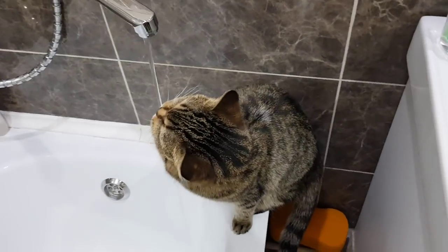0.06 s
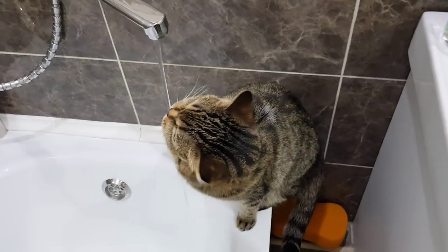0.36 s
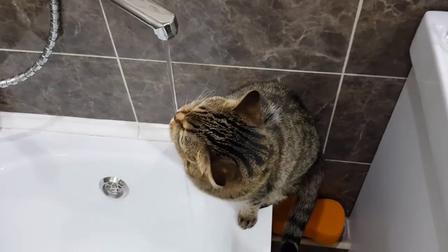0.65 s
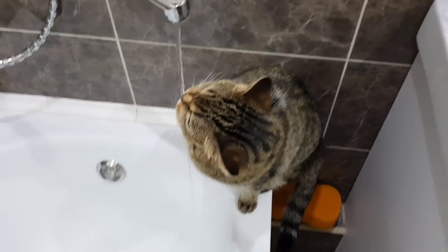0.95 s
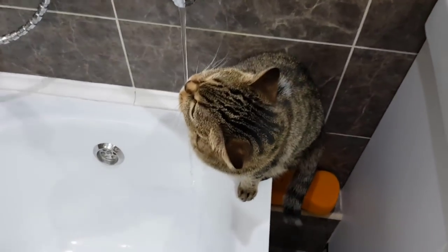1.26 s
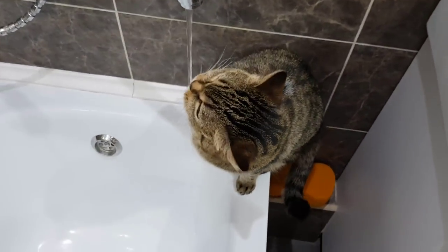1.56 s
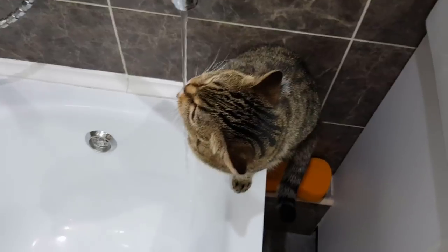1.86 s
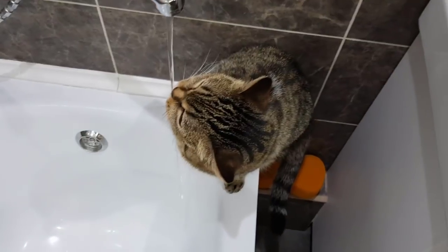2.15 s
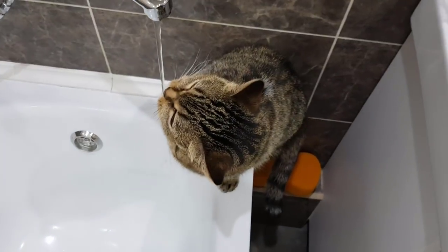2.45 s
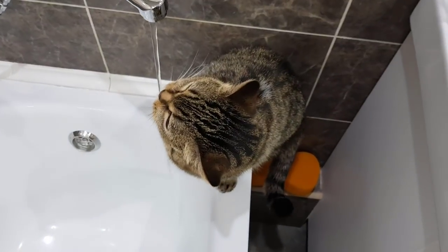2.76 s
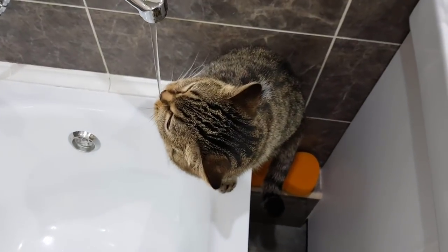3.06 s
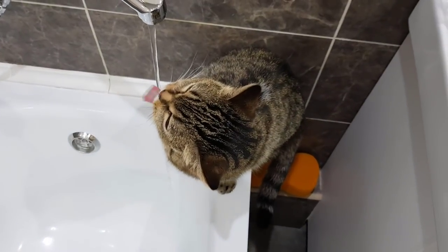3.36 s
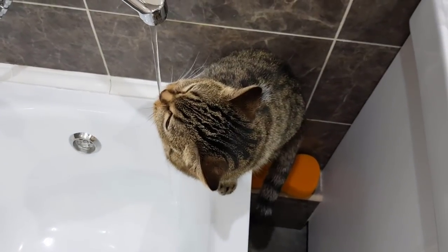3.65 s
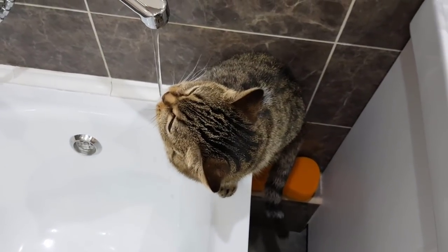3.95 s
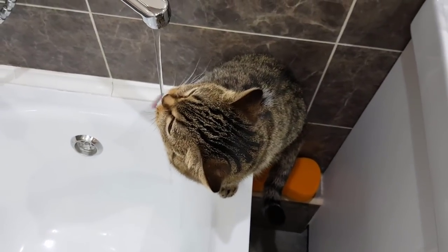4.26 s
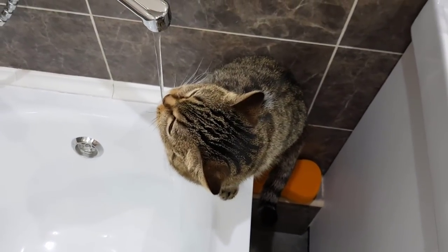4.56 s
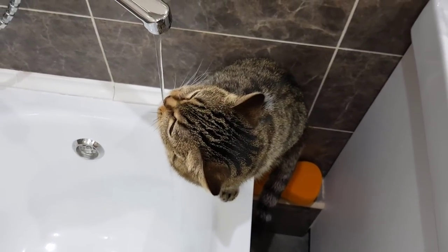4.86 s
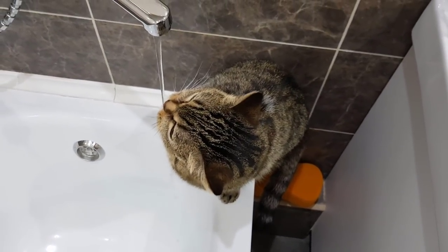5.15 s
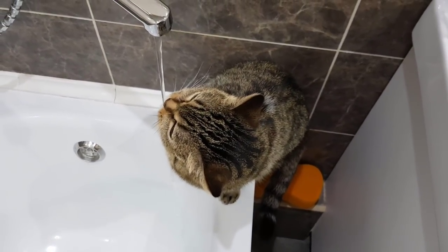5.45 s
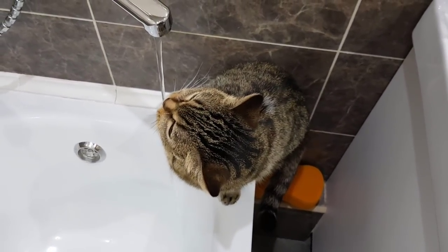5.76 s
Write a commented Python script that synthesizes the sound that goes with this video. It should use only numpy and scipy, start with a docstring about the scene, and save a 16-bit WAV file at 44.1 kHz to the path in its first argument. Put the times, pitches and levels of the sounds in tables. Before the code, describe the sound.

A thin stream of tap water runs into a bathtub for the whole six seconds, quiet and steady, a little to the right. It hisses, fizzes and gurgles, with tiny ringing bubbles and faint, thin whistling tones. The tub drums dully beneath it, with an occasional soft thud, over a low hum that swells slightly between 3 and 5 seconds.

A cat laps at the stream from about 0.5 seconds to the end, making faint, wet tongue ticks roughly twice a second. At about 1.3 seconds its lips part with one short, high squeak. Soft gulps come now and then, clearest at about 0.6 and 5.6 seconds. Small flung drops plink here and there, more often after 2.4 seconds. The small tiled bathroom gives everything a short, bright echo.

```python
"""A thin stream of tap water hisses and gurgles into a bathtub in a small tiled bathroom.
Droplets and tiny bubbles ring, thin tones whistle and the tub drums under the stream, over a low hum.
A cat drinks from it: soft gulps puff through its throat, its tongue flings drops and ticks in the water,
and its wet lips squeak once as they part."""
import sys
import numpy as np
from scipy import signal
from scipy.fft import rfft, irfft, next_fast_len
from scipy.io import wavfile
from scipy.ndimage import map_coordinates

SR = 44100
rng = np.random.default_rng(int(sys.argv[2]) if len(sys.argv) > 2 else 0)


def generate_wav(sig):
    """Save sig (samples, or channels by samples) to the path in sys.argv[1] as 16-bit PCM at SR."""
    pcm = np.round(np.clip(np.atleast_2d(sig).T, -1, 1) * 32767).astype(np.int16)
    wavfile.write(sys.argv[1], SR, pcm)


N = 264600


def amp(db):
    """Decibels to gain."""
    return 10 ** (np.asarray(db) / 20)


def unit(x):
    """x scaled to rms 1."""
    return x / np.sqrt(np.mean(x ** 2) + 1e-20)


def along(points, hz):
    """Reads a curve of (Hz, value) points on a log frequency axis."""
    freqs, values = np.transpose(points)
    return np.interp(np.log(hz + 1), np.log(freqs + 1), values)


def wobble(rate):
    """A smooth random curve, rate knots a second."""
    knots = rng.standard_normal(int(N * rate / SR) + 4)
    return map_coordinates(knots, [np.arange(N) * rate / SR])


def filtered(x, response):
    """x through a filter given as complex gain against frequency."""
    size = next_fast_len(x.shape[-1] + SR // 2)
    return irfft(rfft(x, size) * response(np.fft.rfftfreq(size, 1 / SR)), size)[..., :x.shape[-1]]


def coloured(x, spectrum):
    """x through an EQ curve of (Hz, dB) points, at rms 1."""
    return unit(filtered(x, lambda hz: amp(along(spectrum, hz))))


def resonances(modes, f):
    """Response of a bank of (Hz, width in Hz, dB) resonators in alternating polarity."""
    return sum((-1) ** k * amp(db) * 1j * f * width / (hz * hz - f * f + 1j * f * width)
               for k, (hz, width, db) in enumerate(modes))


def swelling(t, peak_s):
    """A soft rise to 1 at peak_s and a slower fall; silent before t = 0."""
    u = np.maximum(t, 0) / peak_s
    return u ** 2 * np.exp(2 - 2 * u)


def burst(noise, envelope):
    """Noise under an envelope, at rms 1 where the envelope is 1."""
    return unit(noise * envelope) * np.sqrt(np.mean(envelope ** 2))


def add(track, start, sound):
    """Lays a sound into the track at start seconds."""
    part = track[..., max(0, round(start * SR)):][..., :sound.shape[-1]]
    part += sound[..., :part.shape[-1]]


# The reverb of the tiled room. Each row: frequency in Hz, seconds to fall 60 dB.
TILE_DECAY = [(100, .4), (1000, .33), (4400, .38), (6000, .25), (15000, .18)]

def bathroom(x, wet_db):
    """Direct sound plus the ring of the tiles, different at each ear; keeps the energy."""
    hz, t, noise = signal.stft(rng.standard_normal((2, SR // 2)), SR, nperseg=256)
    t60 = along(TILE_DECAY, hz)[:, None]
    tail = signal.istft(noise * amp(-60 * t / t60), SR, nperseg=256)[1]
    impulse = amp(wet_db) * tail / np.linalg.norm(tail[0])
    impulse[:, 0] += 1  # the direct sound
    return signal.fftconvolve(x[None], impulse / np.linalg.norm(impulse[0]), axes=1)[:, :N]


def standing_waves(x, depth_db, spacing_hz, drift_per_s):
    """Echoes between the tiles ripple the spectrum; the pattern drifts as the listener moves."""
    hz, t, spectrum = signal.stft(x, SR, nperseg=2048)
    grid = np.meshgrid(hz / spacing_hz, t * drift_per_s, indexing="ij")
    ripple = np.array([map_coordinates(rng.standard_normal((1024, 16)), grid, mode="wrap") for ear in x])
    return unit(signal.istft(spectrum * amp(depth_db * ripple), SR, nperseg=2048)[1][:, :N])


def patter(rate, spread_db):
    """Random droplet impacts, rate a second, with a few large among many small."""
    hit = rng.random(N) < rate / SR
    size = amp(spread_db * np.clip(rng.standard_normal(N), -2, 2))
    return unit(hit * size * np.sign(rng.standard_normal(N)))


def spray(rate, wash_db):
    """Stereo droplet impacts: their direct sound over the smooth wash of their countless echoes."""
    direct_db, left_late_s = -5.5, .00008
    near = np.array([patter(rate, spread_db=4), patter(rate, spread_db=1.0)])
    echoes = unit(near + amp(wash_db) * rng.standard_normal((2, N)))
    impacts = unit(patter(rate, spread_db=1.0) + rng.standard_normal(N))
    direct = filtered(impacts, lambda f: np.exp(-2j * np.pi * np.outer([left_late_s, 0], f)))
    return standing_waves(echoes + amp(direct_db) * direct, depth_db=3.3, spacing_hz=55, drift_per_s=.6)


# The tone of the water's three registers. Each row: frequency in Hz, gain in dB.
GURGLE_EQ = [(820, -29), (1400, -33.5), (1810, -18), (1960, 1.5), (2080, -1), (2220, -0.5), (2320, -8.5),
             (2380, -1), (2510, 4), (2900, -3), (3040, -46), (3300, -45), (4290, -49), (7260, -120)]
SPOUT_EQ = [(1760, -23), (3000, -9.5), (3150, -11.5), (3450, -5.5), (4160, -2), (4330, -1), (4600, 4),
            (5640, -1.5), (6240, -3), (7430, -17), (7800, -27), (10100, -52), (17200, -120)]
FIZZ_EQ = [(5000, -40.5), (7400, -24), (8300, -12.5), (10000, -8.5), (10800, -6), (11700, -7), (13000, -4),
           (13750, -4.5), (14200, 3), (14650, 0), (15100, -2), (15700, -2.5)]
# The gurgle's fader ride. Each row: time in seconds, gain in dB.
GURGLE_RIDE = [(0, 1.5), (.5, 1.5), (.8, -1.8), (1.6, -0.8), (3, 0), (6, -0.5)]

def stream():
    """Droplets and tiny bubbles ring in three registers: gurgle, spout hiss and fine fizz."""
    gurgle_db, spout_db, fizz_db = -58, -53.5, -43.8
    t = np.arange(N) / SR
    ride_db = np.interp(t, *np.transpose(GURGLE_RIDE))
    opening_db = np.interp(t, [0, 0.62], [-0.8, 0])  # the hiss starts a little weak
    bubbles = bathroom(patter(rate=700, spread_db=6.0), wet_db=6.5) + 0.45 * spray(rate=340, wash_db=1.5)
    gurgle = amp(gurgle_db + ride_db) * coloured(bubbles, GURGLE_EQ)
    spout = amp(spout_db + opening_db) * coloured(spray(rate=1800, wash_db=-2.5), SPOUT_EQ)
    fizz = amp(fizz_db + opening_db) * coloured(spray(rate=1500, wash_db=5.5), FIZZ_EQ)
    # the thin stream wavers, its larger bubbles most
    return gurgle * amp(1.45 * wobble(20)) + spout * amp(.8 * wobble(18)) + fizz * amp(.8 * wobble(22))


def bubble(hz, t60, rise):
    """A trapped bubble whose pitch climbs as it dies."""
    t = np.arange(SR // 20) / SR
    envelope = amp(-60 * t / t60) * (1 - np.exp(-t / 0.00077))
    return envelope * np.sin(2 * np.pi * hz * t * (1 + rise * t))


# Two sizes of bubble. Each row: pops per second, pitch in Hz, pitch scatter as a share, level in dB.
BUBBLE_SIZES = [(45, 2510, 0.025, -64), (50, 4680, 0.05, -64)]

def bubble_pops(t60, spread_db):
    """Single bubbles pop out of the running water at random."""
    out, slots = np.zeros((2, N)), N // 100
    slot_s = N / SR / slots
    for rate, hz, scatter, db in BUBBLE_SIZES:
        pops = np.zeros(N)
        popping = rng.random(slots) < rate * slot_s
        detune, strength = np.clip(rng.standard_normal((slots, 2)), -1.8, 1.8).T
        for k in np.flatnonzero(popping):
            pop = bubble(hz * np.exp(scatter * detune[k]), t60, rise=1)
            add(pops, k * slot_s, amp(spread_db * strength[k]) * pop)
        out += amp(db) * unit(bathroom(pops, wet_db=7))
    return out


# Thin tones of the running water. Each row: start and end in seconds, pitch and width in Hz, level in dB.
WATER_TONES = [(0, 6, 2452, 40, -63), (0, 6, 3588, 16, -73), (0, 0.78, 4773, 12, -59.5),
               (0.85, 6, 4771, 16, -67), (1.3, 6, 4470, 70, -65), (0.7, 1.8, 5320, 130, -62),
               (0.2, 2.1, 6358, 40, -68), (0.9, 6, 10830, 110, -67), (0.55, 6, 14190, 110, -57.5),
               (2.3, 6, 14400, 30, -62)]

def water_tones(fade_s):
    """A steady ring near 2450 Hz and faint higher whistles, all thin, jittery lines."""
    out, t = np.zeros((2, N)), np.arange(N) / SR
    for start, end, hz, width, db in WATER_TONES:
        gate = np.clip(np.minimum(t - start, end - t) / fade_s + 1, 0, 1)
        phase = 2 * np.pi * np.cumsum(hz + width / 2 * wobble(4 * width)) / SR
        for ear in out:  # each ear catches its own mix of reflections
            ear += gate * amp(db + 3.6 * wobble(width)) * np.sin(phase + .5 * wobble(width))
    return out


# The boom of the tub's shell. Each row: pitch in Hz, width in Hz, gain in dB.
SHELL_MODES = [(83.2, 6.1, 0), (106, 11.3, -5.5), (117.3, 14.5, -4.5), (134, 10.5, -3), (174.6, 4.1, -3.5)]
# Dull thuds in the tub as the cat drinks. Each row: start in seconds, level in dB.
TUB_THUDS = [(0.04, -57), (0.52, -61), (0.79, -66), (1.3, -56), (1.86, -54), (2.579, -57.5), (2.73, -59),
             (3.2, -55.5), (3.46, -55.5), (4.165, -53), (4.93, -60.5), (5.26, -56.5), (5.63, -54),
             (5.87, -63)]

def tub(drum_db, wander_db, thud_swell_s):
    """The stream drums on the shell, with a thud now and then; the low modes reach both ears alike."""
    t = np.arange(N) / SR
    shell = lambda f: resonances(SHELL_MODES, f) * f ** 4 / (f ** 4 + 65 ** 4)  # low cut at 65 Hz
    blows = patter(rate=900, spread_db=3.0) + amp(-15) * rng.standard_normal((2, N))
    drumming = unit(filtered(blows, shell))
    rumble = filtered(rng.standard_normal(N), shell)
    thuds = sum(amp(db) * burst(rumble, swelling(t - start, thud_swell_s)) for start, db in TUB_THUDS)
    return amp(drum_db + wander_db * wobble(9)) * drumming + thuds


# The colour of the room tone. Each row: frequency in Hz, gain in dB.
ROOM_EQ = [(12, -31), (20, -23), (48, -12.5), (75, -0.5), (160, -21), (224, -20), (285, -18.5),
           (568, -30.5), (871, -29), (1440, -39.5), (1700, -36), (2210, -80), (3740, -120)]

def room_tone(level_db):
    """A bed of dull, steady noise, partly shared by both ears."""
    return amp(level_db) * coloured(rng.standard_normal((2, N)) + 0.61 * rng.standard_normal(N), ROOM_EQ)


# Swells in the low hum. Each row: start in seconds, level in dB.
HUM_SURGES = [(3.31, -54.5), (4.02, -56), (4.89, -60.5)]

def hum(pitch_hz, steady_db, swell_s, waver_hz, waver_db):
    """A low, wavering hum that swells now and then, with a faint tone an octave below."""
    t = np.arange(N) / SR
    phase = 2 * np.pi * np.cumsum(pitch_hz + waver_hz * wobble(18)) / SR
    swell_power = sum((amp(db) * swelling(t - start, swell_s)) ** 2 for start, db in HUM_SURGES)
    level = np.sqrt(amp(steady_db) ** 2 + swell_power) * amp(waver_db * wobble(8.3))
    sub_octave = amp(-73.5 + 1.7 * wobble(2.6)) * np.sin(phase / 2)
    return level * np.sin(phase) + sub_octave


# Soft gulps. Each row: start in seconds, level in dB, swell in seconds, centre in Hz.
GULP_CUES = [(0.074, -61, 0.028, 1410), (0.552, -51, 0.03, 1170), (1.85, -68.5, 0.035, 1610),
             (2.70, -59.5, 0.043, 2300), (3.21, -64.5, 0.043, 406), (4.189, -68.5, 0.061, 230),
             (4.922, -58.5, 0.043, 2000), (5.642, -49, 0.031, 1470)]
# The formants of the throat. Each row: frequency in Hz, width in Hz, gain in dB.
THROAT_MODES = [(247, 63, 0), (430, 39, 2.5), (515, 103, -4.5), (753, 290, -9), (965, 73, -1.5),
                (1180, 175, -3.5), (1370, 200, -4.5), (1516, 78, -2.5), (1710, 72, 0), (1945, 260, 0),
                (2970, 560, 6.5)]
# Short hollow rings around the deep gulps, and one higher plink of a drop.
# Each row: start in seconds, level in dB, pitch in Hz.
SHORT_RINGS = [(0.581, -54, 957), (0.64, -57, 2700), (5.652, -54, 1920), (0.566, -65.5, 580),
               (5.66, -64, 520)]

def gulps(grain, focus, ring_q, ring_swell_s):
    """Soft, wet puffs through the throat; hollow rings surround the deep ones, and one drop plinks."""
    out, t = np.zeros((2, N)), np.arange(SR // 3) / SR
    for start, db, swell_s, centre_hz in GULP_CUES:
        wet_noise = rng.standard_normal(len(t)) * np.exp(grain * rng.standard_normal(len(t)))
        band = lambda f: 1 / np.sqrt(1 + (focus * np.log2((f + 1) / centre_hz)) ** 2)
        mouth = lambda f: band(f) / (1 + (f / 2600) ** 6)  # high cut at 2600 Hz
        puff = filtered(wet_noise, lambda f: resonances(THROAT_MODES, f) * mouth(f))
        add(out, start, bathroom(amp(db) * burst(puff, swelling(t, swell_s)), wet_db=4.0))
    for start, db, hz in SHORT_RINGS:
        ring = filtered(rng.standard_normal(len(t)), lambda f: resonances([(hz, hz / ring_q, 0)], f) ** 2)
        add(out, start, bathroom(amp(db) * burst(ring, swelling(t, ring_swell_s)), wet_db=0))
    return out


# Small plinks. Each row: start in seconds, level in dB before the boost, pitch in Hz.
DROP_CUES = [(0.432, -55, 2500), (1.5858, -49, 2030), (2.407, -51, 2460), (2.624, -49, 2500),
             (2.772, -47, 2400), (4.2029, -47, 2470), (4.394, -56, 2540), (4.7138, -48, 2550),
             (4.9382, -50, 1940), (5.3989, -44, 2320), (5.411, -45, 2650), (5.8265, -53, 2650)]

def flung_drops(t60, rise, boost_db):
    """Each drop flung off the tongue traps a bubble as it lands."""
    out = np.zeros((2, N))
    for start, db, hz in DROP_CUES:
        add(out, start, bathroom(amp(db + boost_db) * bubble(hz, t60, rise), wet_db=3.0))
    return out


# Laps of the tongue. Each row: start in seconds, level in dB, seconds to fall 60 dB.
LAP_CUES = [(0.5302, -47, 0.18), (1.067, -46, 0.031), (1.2085, -42, 0.031), (1.3326, -36.5, 0.036),
            (1.728, -44, 0.02), (1.7782, -43.5, 0.043), (2.396, -41, 0.045), (2.7732, -41, 0.022),
            (3.211, -42, 0.07), (3.498, -41, 0.025), (4.219, -42, 0.031), (4.747, -37.5, 0.031),
            (5.272, -48, 0.077), (5.869, -48, 0.12)]
# The bright tone of a lap. Each row: frequency in Hz, gain in dB.
LAP_EQ = [(900, -17.5), (2500, -24), (5000, -5.5), (7500, 0.5), (11500, 9), (15500, -1)]

def tongue_laps(pull_back_s, pull_back_db):
    """The tongue breaks the stream with a tick or a longer splash, and ticks again as it pulls back."""
    out, t = np.zeros((2, N)), np.arange(SR // 8) / SR
    for start, db, t60 in LAP_CUES:
        envelope = amp(-60 * t / t60) * (1 - np.exp(-t / 0.000098))
        for late_s, trim_db in [(0, 0), (pull_back_s, pull_back_db)]:
            tick = envelope * coloured(rng.standard_normal(len(t)), LAP_EQ)
            add(out, start + late_s, amp(db + trim_db) * bathroom(tick, wet_db=2))
    return out


# Slips of the lips within the one squeak. Each row: start in seconds, level in dB, pitch in Hz.
LIP_SLIPS = [(1.331, -34, 4450), (1.334, -28.5, 5620), (1.341, -27.5, 4650), (1.343, -36, 4650),
             (1.3481, -29.5, 4320), (1.353, -27.5, 4270), (1.358, -29.5, 4080), (1.364, -37, 4450)]

def lip_squeak(swell_s, grit, sweep_per_s):
    """Wet lips part in a quick crackle of ragged pips, each sweeping upward, that run together."""
    pips, t = np.zeros(N), np.arange(SR // 100) / SR
    for start, db, hz in LIP_SLIPS:
        pitch = hz * (1 + sweep_per_s * (t - swell_s))
        phase = np.cumsum(2 * np.pi * pitch / SR + grit * rng.standard_normal(len(t)))
        add(pips, start, amp(db) * swelling(t, swell_s) * np.sin(phase))
    band_pass = lambda f: f ** 12 / (f ** 12 + 3300 ** 12) / (1 + (f / 8000) ** 4)
    return bathroom(filtered(pips, band_pass), wet_db=-1.5)


# The stereo lean of the whole mix. Each row: frequency in Hz, left minus right in dB.
STEREO_LEAN = [(60, 1), (92, 3), (140, 2), (210, 1), (330, 0.5), (500, 1), (770, -0.5), (1170, 1),
               (1790, -9), (2740, -2), (4190, -4.5), (6410, 3.5), (9810, 0.5), (15000, -3.5)]

def scene():
    """Water, room and cat together; the tap lies a little to the right."""
    water = stream() + bubble_pops(t60=0.028, spread_db=3.0) + water_tones(fade_s=.12)
    water += tub(drum_db=-64.5, wander_db=1.5, thud_swell_s=0.03)
    bed = room_tone(level_db=-66.5)
    bed += hum(pitch_hz=67.0, steady_db=-60.5, swell_s=0.16, waver_hz=2.47, waver_db=1.0)
    cat = gulps(grain=0.75, focus=1.64, ring_q=8.8, ring_swell_s=0.018)
    cat += flung_drops(t60=0.031, rise=1.3, boost_db=7.0)
    cat += tongue_laps(pull_back_s=0.014, pull_back_db=-3.5)
    cat += lip_squeak(swell_s=.0015, grit=.21, sweep_per_s=36)
    return filtered(water + bed + cat, lambda hz: amp(np.outer([.5, -.5], along(STEREO_LEAN, hz))))


def record(dry):
    """A brick-wall high cut at 15700 Hz."""
    return filtered(dry, lambda hz: hz < 15700)


dry = scene()
out = record(dry)
generate_wav(out)
```